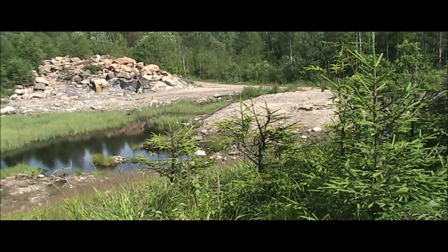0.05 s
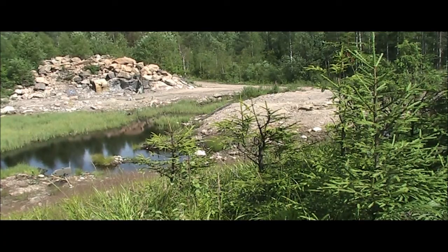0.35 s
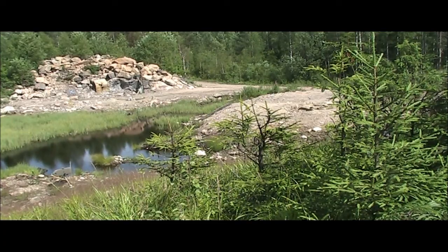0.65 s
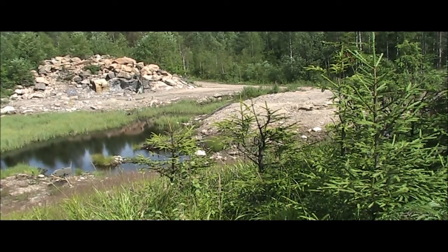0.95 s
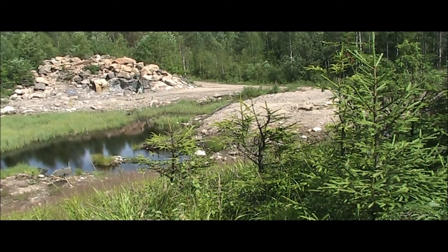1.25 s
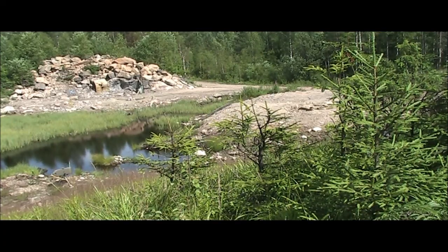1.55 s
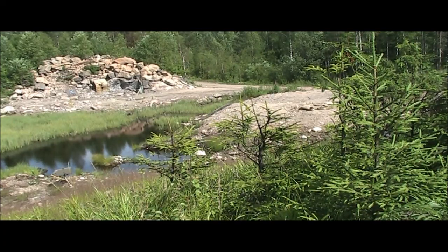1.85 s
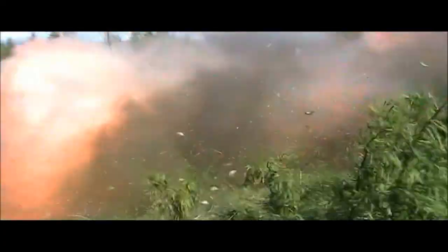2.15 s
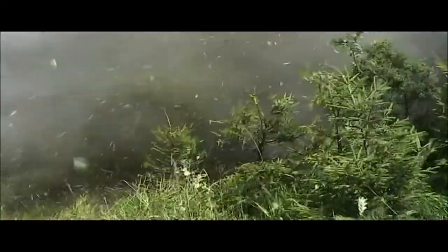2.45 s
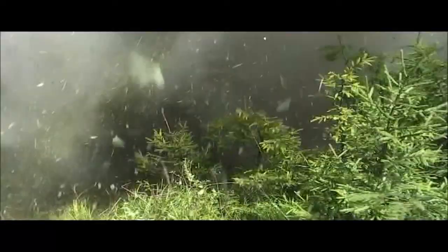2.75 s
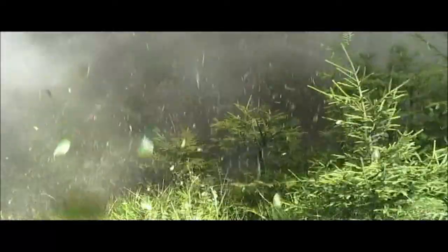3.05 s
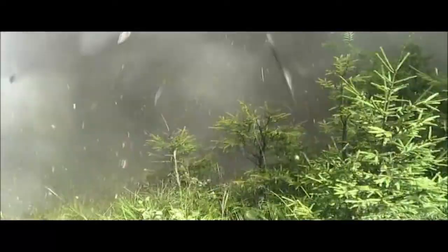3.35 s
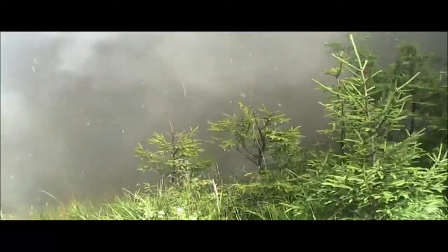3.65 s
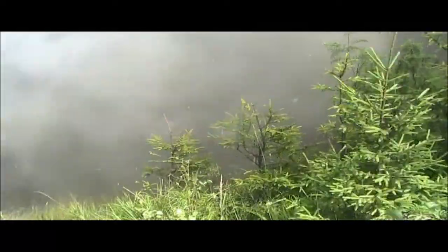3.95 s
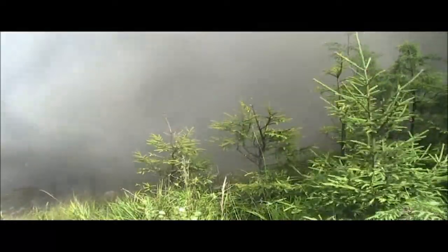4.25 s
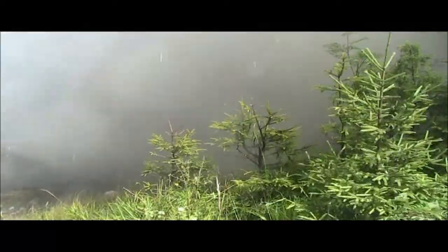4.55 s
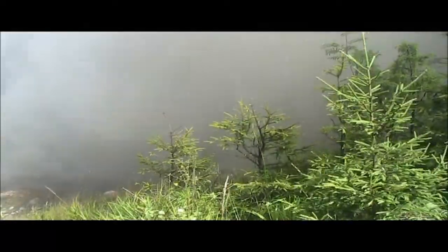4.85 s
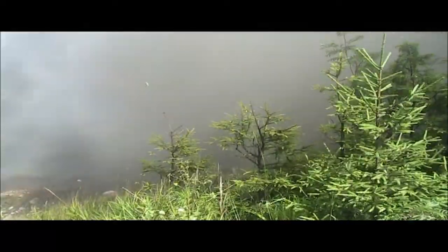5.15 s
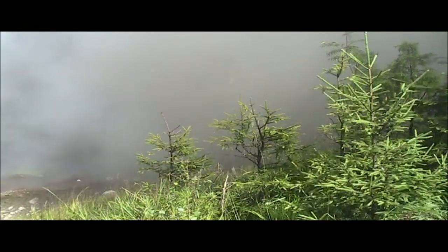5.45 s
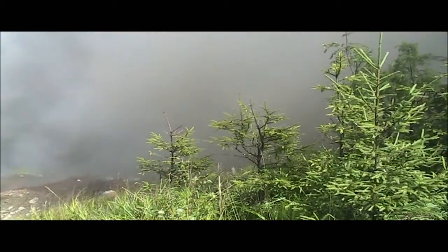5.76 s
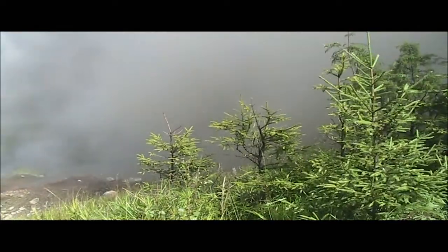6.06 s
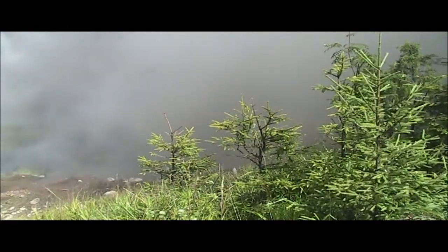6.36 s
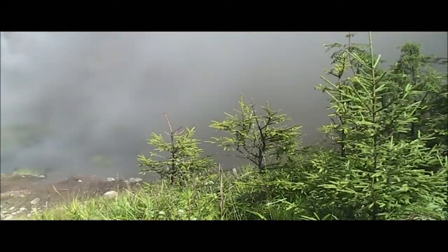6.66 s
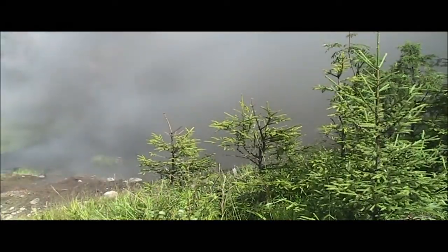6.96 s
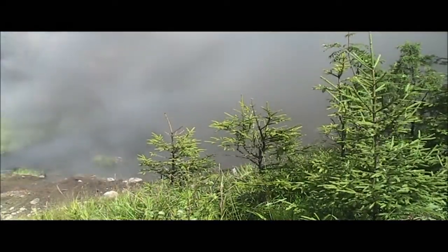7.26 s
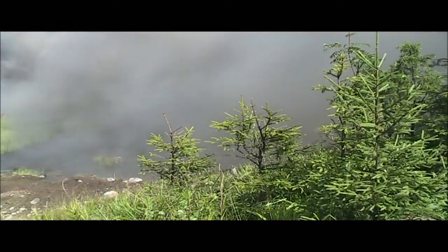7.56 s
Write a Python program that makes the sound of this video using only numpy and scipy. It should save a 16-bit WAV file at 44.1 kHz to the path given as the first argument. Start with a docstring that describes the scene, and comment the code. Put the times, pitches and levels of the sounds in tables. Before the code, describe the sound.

Forest quiet is broken by one huge, distorted blast that echoes away, followed by a shower of falling earth and knocking stones.

```python
"""A quiet forest quarry, among young spruces: a mine explodes close by.
A ground shock runs ahead of the air blast, which overloads the microphone and rolls back
from the forest, ever duller. Then the thrown soil comes down: a rush of clods, grit
sprinkling the needles, and single stones hitting ground and brush."""
import sys
import numpy as np
from scipy import signal
from scipy.fft import rfft, irfft
from scipy.io import wavfile
from scipy.ndimage import uniform_filter1d

SR = 44100
rng = np.random.default_rng(int(sys.argv[2]) if len(sys.argv) > 2 else 0)


def unload_wav(signal):
    """Save mono or channel-first audio to the path in sys.argv[1] as 16-bit WAV at rate SR, clipped to [-1, 1]."""
    wavfile.write(
        sys.argv[1],
        SR,
        np.round(np.clip(np.atleast_2d(signal).T, -1, 1) * 32767).astype(np.int16),
    )


N = 344862
T = np.arange(N) / SR
SHOCK_S = 2.0305
SHOCK_AGE_S = np.maximum(T - SHOCK_S, 0)
AFTER_SHOCK = T >= SHOCK_S


def undb(db):
    """Decibels to gain."""
    return 10 ** (np.asarray(db) / 20)


def unit(x):
    """Scale to an rms of 1."""
    return x / np.sqrt(np.mean(x ** 2) + 1e-18)


def pan(left_db):
    """Channel gains for a left-over-right level difference."""
    gains = undb(np.array([left_db, -left_db]) / 2).reshape(2, -1)
    return gains / np.sqrt(np.mean(gains ** 2, axis=0))


def band(x, hz, octaves, order=2):
    """Causal band-pass around a centre."""
    half = 2 ** (max(octaves, 0.2) / 2)
    edges_hz = [min(hz / half, 0.4 * SR), min(hz * half, 0.45 * SR)]
    return signal.sosfilt(signal.butter(order, edges_hz, "band", fs=SR, output="sos"), x)


def smooth(x, time_s):
    """One-pole running average."""
    keep = np.exp(-1 / (time_s * SR))
    return signal.lfilter([1 - keep], [1, -keep], x)


def spectrum_db(points, hz):
    """Read a spectrum on a log-frequency axis."""
    points_hz, db = np.transpose(points)
    return np.interp(np.log(np.maximum(hz, 1)), np.log(points_hz), db)


def colour(x, points, size=4096):
    """Minimum-phase filter with the given spectrum; output rms 1."""
    gains = undb(spectrum_db(points, np.fft.rfftfreq(size, 1 / SR)))
    cepstrum = irfft(np.log(gains))
    cepstrum[1:size // 2] *= 2
    cepstrum[size // 2 + 1:] = 0
    response = irfft(np.exp(rfft(cepstrum)))
    return unit(signal.fftconvolve(x, response[None], axes=1)[:, :N])


def stereo_noise(side_db, size=N):
    """Noise common to both ears plus a share that differs."""
    mid, side = rng.standard_normal((2, size))
    gain = undb(side_db)
    return (mid + gain * side * np.array([[1], [-1]])) / np.sqrt(1 + gain ** 2)


def walk(per_s):
    """Random steps, slewed twice; spread near 1."""
    hold = int(SR / per_s)
    steps = np.repeat(rng.standard_normal(N // hold + 1), hold)
    return 1.3 * uniform_filter1d(uniform_filter1d(steps, hold), hold)[:N]


def impacts(per_s, spread_db, scatter_db):
    """Random impulses, many small and few large, each from its own direction."""
    chance = np.minimum(per_s / SR, 1)
    size = undb(spread_db * np.minimum(rng.exponential(size=N), 5))
    hits = (rng.random(N) < chance) * size * rng.choice([-1, 1], N) / np.sqrt(chance)
    return hits * pan(scatter_db * rng.standard_normal(N))


def swell(peak_s, db, rise_db_s, fall_db_s):
    """Gain that rises to a peak and falls, linearly in dB."""
    return undb(db - np.maximum(rise_db_s * (peak_s - T), fall_db_s * (T - peak_s)))


def place(events):
    """Mix (start in seconds, sound) pairs into a stereo track."""
    out = np.zeros((2, N))
    for start_s, sound in events:
        i = int(start_s * SR)
        out[:, i:i + sound.shape[-1]] += sound[..., :N - i]
    return out


# Each row: frequency in Hz, relative density in dB.
FOREST_SPECTRUM = [(30, -3), (68, 1), (110, 1.5), (200, -3), (480, -4), (1200, -9.5), (2800, -15),
                   (5900, -16), (10000, -27.5), (15000, -37)]
def forest(db=-49):
    """A light breeze in distant trees."""
    return colour(stereo_noise(-2.1), FOREST_SPECTRUM) * undb(db + 0.5 * walk(1.44))


def ground_shock(hz=205, db=-1, peak_s=2.0246, width_s=0.0043, zero_phase_s=1.6):
    """The ground wave shakes the microphone for a few cycles ahead of the air blast."""
    level = undb(db) * np.exp(-((T - peak_s) / width_s) ** 2)
    return -level * np.sin(2 * np.pi * hz * (T - zero_phase_s))


def pressure_pulse(db=3, push_s=0.004, lead_s=0.0031, suction=0.16, suction_s=0.0056):
    """The blast wave thumps the microphone housing: a heavy push, then a longer, weaker suction."""
    age = T - SHOCK_S + lead_s
    push = np.sin(np.pi * np.clip(age / push_s, 0, 1))
    pull = np.sin(np.pi * np.clip((age - push_s) / suction_s, 0, 1))
    return undb(db) * (suction * pull - push)


def shock_crack(db=3, hz=850, length_s=0.0045):
    """The shock front: a few milliseconds of crack before any echo returns."""
    front = unit(band(stereo_noise(-14), hz, octaves=2.6))
    return front * undb(db) * np.exp(-(SHOCK_AGE_S / length_s) ** 4) * AFTER_SHOCK


# The roar before air loss. Each row: frequency in Hz, relative density in dB.
ROAR_SPECTRUM = [(60, -7), (150, -13), (260, 2.5), (380, 1), (600, 1.2), (1100, -3), (1800, -7), (2900, -6),
                 (5000, -10), (8000, -11.5), (15000, -21)]
# Quarry, then far forest. Each row: peak in seconds, level in dB, rise in dB/s, fall in dB/s.
ECHO_SWELLS = [(2.26, 4, 84, 36.5), (3.76, -9.5, 13, 48)]
def roar(db=-3, fall_db_s=8.5, air_db=4.5, front_db=10, front_s=0.0035, build_s=0.066,
         narrow_above_hz=5600):
    """The shock and its countless echoes; later ones have come further and lost more treble."""
    age = SHOCK_AGE_S
    echo_power = sum(swell(*echo) ** 2 for echo in ECHO_SWELLS)
    level = np.sqrt(undb(db - fall_db_s * age) ** 2 + echo_power)
    centres_hz = 62.5 * 2 ** np.arange(0, 8.1, 0.5)
    weights = undb(spectrum_db(ROAR_SPECTRUM, centres_hz)) * np.sqrt(centres_hz)
    path = 1.675 * np.tanh(age / 2.32)  # the dulling levels off
    out = 0
    for hz, weight in zip(centres_hz, weights / np.linalg.norm(weights)):
        loss_db = air_db * path * (hz / 1000) ** 1.155
        build = 1 - np.exp(-(age / build_s) ** 2) / (1 + (hz / 1300) ** 2)  # lows come late
        early_side_db = -3 if hz < narrow_above_hz else -20  # early roar wide, its top treble centred
        far_side_db = np.interp(hz, [400, 2000], [-16, -6.5])  # far echoes come from ahead
        side_db = np.interp(age, [0.2, 0.38], [early_side_db, far_side_db])
        noise = unit(band(stereo_noise(side_db), hz, octaves=0.56, order=3))
        out = out + weight * build * undb(-loss_db) * noise
    front = 1 + undb(front_db) * np.exp(-age / front_s)
    return out * front * level * undb(0.5 * walk(29.79)) * AFTER_SHOCK


def tearing(per_s=320, hz=2600):
    """Sharp reflections from single trunks and rocks crackle through the roar."""
    cracks = unit(band(impacts(per_s, spread_db=2, scatter_db=3), hz, octaves=1.7))
    return cracks * swell(peak_s=2.28, db=-12, rise_db_s=18, fall_db_s=42) * AFTER_SHOCK


def boom(high_hz=98.86, low_hz=33.9, sink_s=0.6, width_hz=21, build_s=0.086):
    """A deep rumble that sinks in pitch as the fireball spreads, then lingers."""
    hz = low_hz + (high_hz - low_hz) / (1 + (SHOCK_AGE_S / sink_s) ** 4)
    phase = 2 * np.pi * np.cumsum(hz) / SR
    lowpass = signal.butter(3, width_hz, fs=SR, output="sos")
    slow = signal.sosfilt(lowpass, stereo_noise(-18, size=2 * N))
    rumble = unit(slow[:, :N] * np.cos(phase) + slow[:, N:] * np.sin(phase))
    tail_db = -13 - 3.5 * SHOCK_AGE_S
    level = np.hypot(swell(peak_s=2, db=-6.5, rise_db_s=50, fall_db_s=9.5), undb(tail_db))
    return rumble * level * (1 - np.exp(-SHOCK_AGE_S / build_s))


def needle_hiss(per_s=6000, hz=10500):
    """Dust driven by the blast hisses through the spruce needles."""
    hiss = unit(band(impacts(per_s, spread_db=2.6, scatter_db=9.9), hz, octaves=0.89))
    return hiss * swell(peak_s=2.15, db=-42, rise_db_s=60, fall_db_s=13) * AFTER_SHOCK


def rock_face(hz=440):
    """The quarry face throws back the low middle of the blast."""
    echo = unit(band(stereo_noise(-4.5), hz, octaves=1.17))
    return echo * swell(peak_s=2.274, db=3, rise_db_s=110, fall_db_s=80) * AFTER_SHOCK


def blast_wind(peak_s=2.4, width_s=0.16, db=3, hz=48):
    """The rush of air buffets the microphone in uneven swings."""
    swings = np.tanh(unit(band(stereo_noise(-21), hz, octaves=2.34)))
    return undb(db) * np.exp(-((T - peak_s) / width_s) ** 2) * swings * AFTER_SHOCK


def landing(db, hz, octaves, decay_s, crack_db, rough_db=4, hard_s=0.0024, size=6000):
    """A first knock and a dying cluster of tiny contacts, in a band set by what is hit."""
    age = np.arange(size) / SR
    contacts = stereo_noise(-16, size) * undb(rough_db * rng.standard_normal(size))
    attack = 1 - np.exp(-age / (0.009 * decay_s))  # brush yields gradually
    contacts *= attack * np.exp(-age / decay_s)
    hardness = np.exp(-decay_s / hard_s)  # bare stones knock hard
    contacts[:, SR // 1000] += np.linalg.norm(contacts) * hardness
    left_db = np.clip(6.5 * np.log2(hz / 1200), 0, 9.5)  # higher hits lie further left
    body = unit(band(contacts, hz, octaves)) * pan(left_db)
    crack = undb(crack_db) * unit(band(contacts, 1.16 * hz, octaves=1.56))
    return (body + crack) * np.sqrt(decay_s * SR / size) * undb(db)


# Each row: start in seconds, level in dB, centre in Hz.
PEBBLE_CLICKS = [(3.007, -32, 8460), (3.492, -22.5, 7000), (4.423, -25, 8000), (4.658, -18, 4400),
                 (4.964, -20, 7040), (5.013, -24, 8500), (5.057, -15.5, 2560), (5.212, -22.5, 6600),
                 (5.314, -35, 9000), (5.424, -19.5, 4930), (5.472, -20, 2380), (5.896, -17.5, 2620),
                 (5.985, -24, 2900), (6.011, -24, 2400), (6.128, -19, 6400), (6.165, -22, 6030),
                 (6.211, -29, 6000), (6.234, -30, 3400), (6.342, -26, 8500), (6.389, -14, 3300),
                 (6.681, -19.5, 4230), (6.707, -23, 7000), (6.733, -25.5, 6600), (6.757, -28, 7800),
                 (6.818, -24, 5260), (6.834, -24, 3150), (6.867, -27, 6400), (6.9588, -28, 7000),
                 (7.052, -18.5, 3520), (7.3253, -25, 2300), (7.425, -29, 5600), (7.53, -25.5, 5500),
                 (7.689, -21.5, 2410), (7.811, -19.5, 3400)]
def pebble_clicks():
    """Pebbles click on branches."""
    return place((start_s, landing(db, hz, octaves=0.82, decay_s=0.0022, crack_db=-19.5))
                 for start_s, db, hz in PEBBLE_CLICKS)


GRIT_LEVEL = swell(peak_s=4.5, db=-23.1, rise_db_s=25, fall_db_s=3.6)
# Each row: frequency in Hz, relative density in dB.
GRIT_SPECTRUM = [(300, 6), (1000, 2), (2000, -3), (3800, -2.5), (5500, -7), (7500, -5), (10000, -12),
                 (15000, -19.5)]
def grit(dull_hz=9500, surge_db=1.24):
    """Sand ticks on needles and grass in small surges, sparser and duller as the shower ends."""
    per_s = np.interp(T, [4.7, 7.5], [6500, 2200])
    ticks = colour(impacts(per_s, spread_db=2, scatter_db=5.4), GRIT_SPECTRUM)
    dull = signal.sosfiltfilt(signal.butter(2, dull_hz, fs=SR, output="sos"), ticks)
    dull_share = np.interp(T, [5, 7.4], [0, 0.75])
    return (ticks + dull_share * (dull - ticks)) * GRIT_LEVEL * undb(surge_db * walk(23)) * AFTER_SHOCK


def patter(per_band_per_s=45, scuff_s=0.005):
    """Crumbs glance off the foliage in soft scuffs at four pitches."""
    scuffs = 0
    for hz in np.geomspace(3000, 7600, 4):
        power = smooth(impacts(per_band_per_s, spread_db=1, scatter_db=4.4) ** 2, scuff_s)
        bursts = np.sqrt(power + 1e-18) * stereo_noise(-1)
        scuffs = scuffs + unit(band(bursts, hz, octaves=0.46, order=3))
    return unit(scuffs) * swell(peak_s=4.5, db=-31.5, rise_db_s=28, fall_db_s=3) * AFTER_SHOCK


# Each row: frequency in Hz, relative density in dB.
CLOD_SPECTRUM = [(50, -13), (100, -21), (160, -12), (280, 0.5), (480, 4.5), (800, -0.5), (1300, -7),
                 (2500, -20.5), (6000, -45.5)]
def clods(peak_per_s=6300):
    """Soil lands as a dense rush of dull thuds that thins as it fades."""
    heavy = swell(peak_s=4.66, db=-14.9, rise_db_s=8.5, fall_db_s=14)
    stragglers = swell(peak_s=6.5, db=-35.5, rise_db_s=12, fall_db_s=7)
    level = np.hypot(heavy, stragglers)
    hits = impacts(peak_per_s * level / level.max(), spread_db=2.3, scatter_db=3.7)
    fade_in = np.interp(T, [3.6, 4.2], [0, 1])
    return colour(hits, CLOD_SPECTRUM) * level * undb(0.51 * walk(24.63)) * fade_in


# Each row: start in seconds, level in dB, centre in Hz.
EARTH_THUDS = [(3.774, -21, 119), (3.86, -17.5, 135), (4.53, -22.5, 120), (5.014, -19.5, 150),
               (5.367, -26, 125), (5.514, -21.5, 112), (5.766, -19, 92), (6.166, -24, 100),
               (6.385, -17.5, 151), (7.255, -27, 84.6), (7.409, -23, 48)]
def earth_thuds(decay_cycles=1.36):
    """Lumps of earth thud down and die within a few cycles, so deep ones last longer."""
    return place((start_s, landing(db, hz, octaves=0.9, decay_s=decay_cycles / hz, crack_db=-8))
                 for start_s, db, hz in EARTH_THUDS)


# Each row: start in seconds, level in dB, centre in Hz, decay in seconds.
BRUSH_CRASHES = [(3.797, -18.5, 1740, 0.032), (3.852, -15.5, 1140, 0.03), (3.889, -19.5, 1370, 0.024),
                 (5.748, -25.5, 3150, 0.018), (6.079, -19, 2400, 0.011), (6.5907, -22.5, 6500, 0.0096),
                 (6.633, -27, 3600, 0.0076), (6.978, -21.5, 2840, 0.013), (7.017, -24, 5530, 0.014)]
def brush_crashes():
    """Rocks crash through brush."""
    return place((start_s, landing(db, hz, octaves=1.08, decay_s=decay_s, crack_db=-11))
                 for start_s, db, hz, decay_s in BRUSH_CRASHES)


# Each row: start in seconds, level in dB, pitch in Hz.
STONE_KNOCKS = [(3.7975, -4, 1900), (3.799, -8, 2100), (3.8017, 4, 1220), (3.8532, 0, 1070),
                (3.856, -1, 1600), (3.8596, 2.5, 570), (3.8623, -4, 610), (3.8686, 3, 1080),
                (3.892, 0.5, 1030), (3.9001, -6, 1560), (5.165, -14, 980), (5.568, -13, 1130),
                (6.158, -20, 790), (7.326, -24, 623), (5.0195, 0, 870), (5.022, -8, 1020),
                (5.3068, -12, 1000), (5.311, -4, 950), (5.8435, 1, 1000), (5.956, -14, 900),
                (5.9856, -14, 1070), (6.389, -9.5, 1050), (6.636, -11, 704), (6.865, -13.5, 860),
                (6.957, -14, 820), (7.6636, -10, 413), (7.715, -19.5, 700)]
def stone_knocks(rise_cycles=0.4, soil_db=-23.5, size=6000):
    """Stones stop dead on bare ground within two or three swings and stir a little soil."""
    events = []
    for start_s, db, hz in STONE_KNOCKS:
        cycles = hz * np.arange(size) / SR
        blow = cycles / rise_cycles * np.exp(1 - cycles / rise_cycles) * np.sin(2 * np.pi * cycles)
        soil = landing(db + soil_db, hz, octaves=1, decay_s=0.0075, crack_db=-5.5, size=size)
        events.append((start_s, soil - undb(db) * blow))
    return place(events)


def twigs(per_band_per_s=5, relative_db=-13):
    """Coarse grit flicks twigs and stems, each ringing briefly at its own pitch."""
    ticks = sum(unit(band(impacts(per_band_per_s, spread_db=0.93, scatter_db=29), hz, octaves=0.2))
                for hz in np.geomspace(1200, 8000, 16))
    fade_in = np.interp(T, [3.8, 5.5], [0, 1])
    return unit(ticks) * GRIT_LEVEL * undb(relative_db) * fade_in


def slab(start_s=4, db=-24, hz=1546, decay_s=0.06):
    """The heaviest rock strikes a slab, which rings with one clear tone."""
    age = np.maximum(T - start_s, 0)
    return undb(db) * np.exp(-age / decay_s) * np.sin(2 * np.pi * hz * age)


# Crumbs and sprays in grass. Each row: frequency in Hz, relative density in dB.
SOIL_SPECTRUM = [(200, -11.5), (500, -7.5), (950, -1.5), (1700, -3), (2450, 0.5), (3400, -0.5), (4500, -5),
                 (5600, -18.5), (7000, -14.5), (9000, -23), (14000, -37)]
def crumbs(per_s=110, crumble_s=0.0033):
    """Small lumps break up in the grass, each a short crunch."""
    power = smooth(impacts(per_s, spread_db=2, scatter_db=7.2) ** 2, crumble_s)
    crunch = colour(np.sqrt(power + 1e-18) * stereo_noise(-10.5), SOIL_SPECTRUM)
    level = swell(peak_s=5, db=-27.5, rise_db_s=23, fall_db_s=8.5)
    return crunch * level * pan(left_db=2) * AFTER_SHOCK


def plops(per_band_per_s=14):
    """As the rush thins, the last small clods plop down singly at five pitches."""
    hits = sum(unit(band(impacts(per_band_per_s, spread_db=1.9, scatter_db=2.1), hz, octaves=0.71))
               for hz in np.geomspace(600, 1050, 5))
    fade_in = np.interp(T, [4.6, 5.4], [0, 1])
    return unit(hits) * swell(peak_s=7.5, db=-39, rise_db_s=2.5, fall_db_s=8) * fade_in


# Each row: start in seconds, level in dB, attack in seconds, decay in seconds.
SOIL_SPRAYS = [(5.505, -25, 0.027, 0.085), (6.615, -25.5, 0.021, 0.073), (7.4603, -21, 0.001, 0.049),
               (7.555, -23, 0.019, 0.064), (7.726, -23.5, 0.0061, 0.11)]
def soil_sprays(fizz_db=-5, fizz_hz=7300, fizz_s=0.015):
    """Loose soil splashes into the grass in dense bursts; fine sand fizzes at each start."""
    body, fizz = 0, 0
    for start_s, db, attack_s, decay_s in SOIL_SPRAYS:
        age = np.maximum(T - start_s, 0)
        shape = (1 - np.exp(-age / attack_s)) * np.exp(-age / decay_s)
        level = undb(db) * shape / shape.max()
        body = body + level
        fizz = fizz + level * np.exp(-age / fizz_s)
    grains = colour(impacts(per_s=7000, spread_db=1.4, scatter_db=6.5), SOIL_SPECTRUM)
    sand = unit(band(impacts(per_s=9800, spread_db=1.4, scatter_db=10), fizz_hz, octaves=0.57))
    return grains * body * pan(left_db=4.5) + undb(fizz_db) * sand * fizz


def scene(foliage_hz=12500):
    """The blast, then the falling soil, over the hush of the forest."""
    blast = ground_shock() + shock_crack() + roar() + tearing() + rock_face() + boom() + blast_wind()
    lull = undb(np.interp(T, [7, 7.27], [0, -2.9]))  # the fine debris runs low
    shower = clods() + (plops() + grit() + twigs() + crumbs() + patter()) * lull
    bed = (blast + shower + forest() + needle_hiss()) * pan(left_db=1.65)
    pieces = stone_knocks() + earth_thuds() + pebble_clicks() + brush_crashes()
    foliage_lowpass = signal.butter(2, foliage_hz, fs=SR, output="sos")
    return bed + signal.sosfilt(foliage_lowpass, pieces) + slab() + soil_sprays()


def saturate(x, ceiling, knee):
    """Round off peaks at a ceiling; a higher knee is harder."""
    return x / (1 + np.abs(x / ceiling) ** knee) ** (1 / knee)


def gain_control(x, threshold_db=-7.5, reaction_s=0.13):
    """Turn both channels down as their running level passes the threshold."""
    power = smooth(np.mean(x ** 2, axis=0), reaction_s)
    return x / (1 + (power / undb(threshold_db) ** 2) ** 3) ** (1 / 6)


# The close pair hears widest in the upper middle. Each row: frequency in Hz, side gain in dB.
STEREO_WIDTH = [(100, 0.5), (300, -4), (700, -4), (1600, 2.5), (3000, 1), (6000, -3.5), (12000, -4)]
def record(dry, wind_cut_hz=250, top_hz=15850):
    """The capsules choke, the thump passes the wind filter, the amplifier clips and turns down."""
    choked = saturate(dry, ceiling=0.79, knee=4)
    thinned = signal.sosfilt(signal.butter(1, wind_cut_hz, "high", fs=SR, output="sos"), choked)
    clipped = saturate(thinned + pressure_pulse(), ceiling=0.89, knee=8)
    left, right = gain_control(clipped)
    width = undb(spectrum_db(STEREO_WIDTH, np.fft.rfftfreq(N, 1 / SR)))
    side = irfft(rfft(left - right) * width, N)
    pair = np.array([left + right + side, left + right - side]) / 2
    return signal.sosfilt(signal.ellip(8, 0.2, 70, top_hz, fs=SR, output="sos"), pair)


dry = scene()
out = record(dry)
unload_wav(out)
```